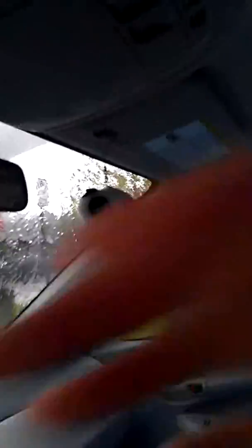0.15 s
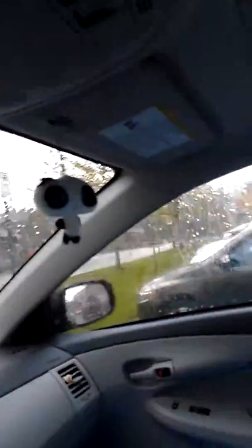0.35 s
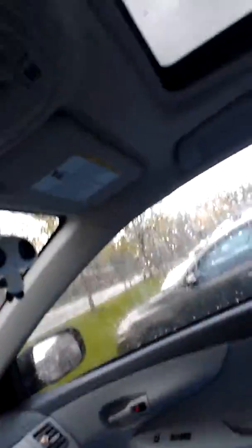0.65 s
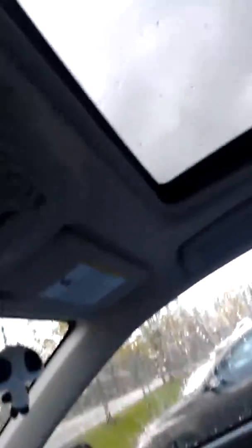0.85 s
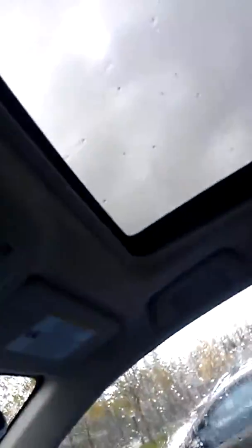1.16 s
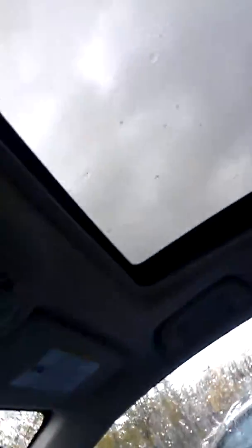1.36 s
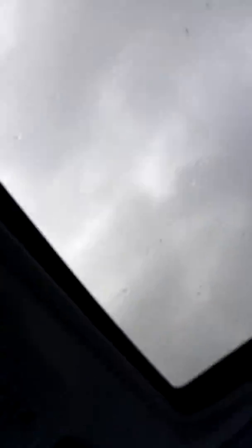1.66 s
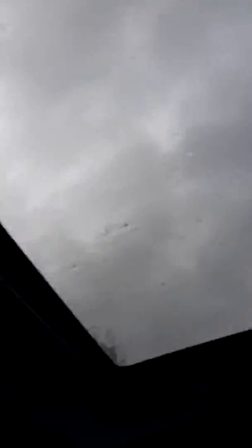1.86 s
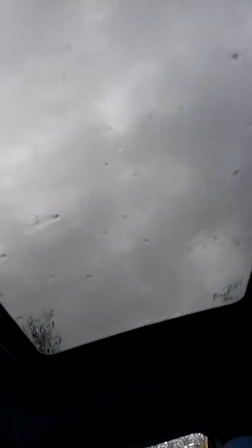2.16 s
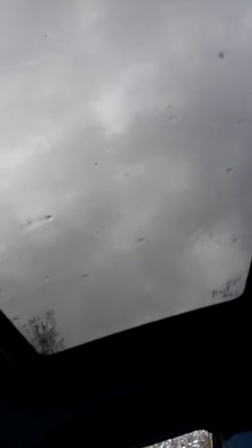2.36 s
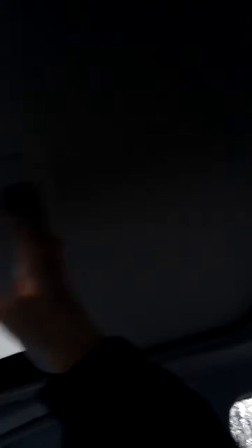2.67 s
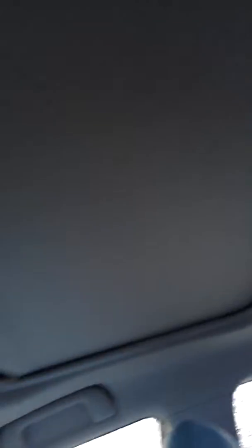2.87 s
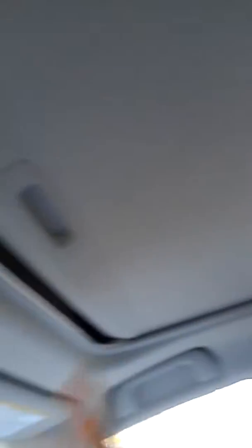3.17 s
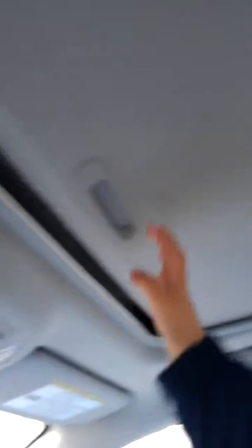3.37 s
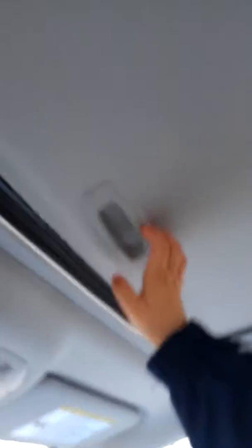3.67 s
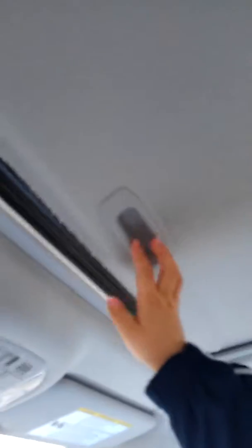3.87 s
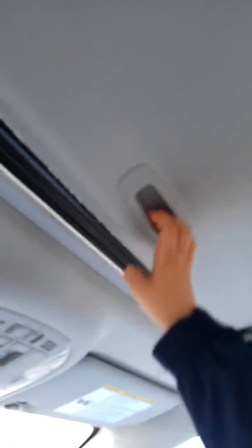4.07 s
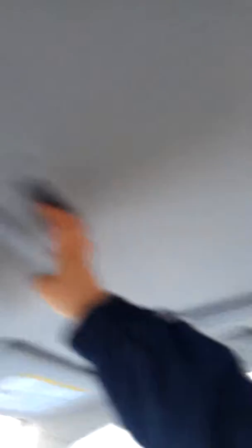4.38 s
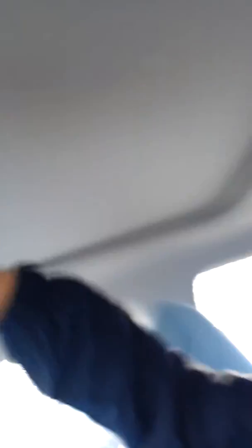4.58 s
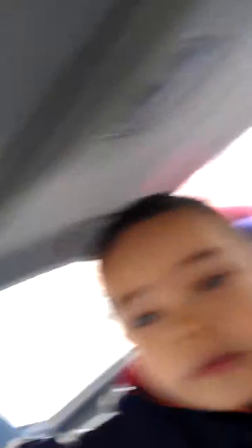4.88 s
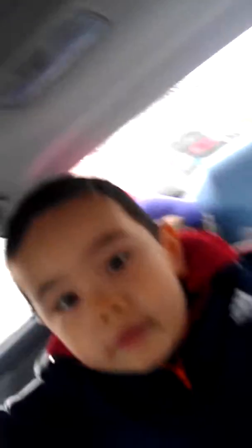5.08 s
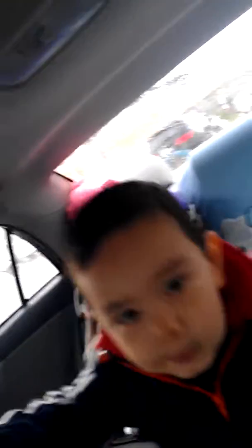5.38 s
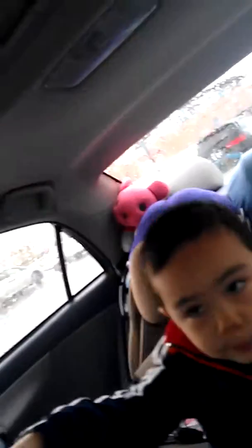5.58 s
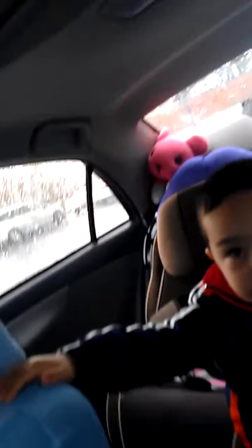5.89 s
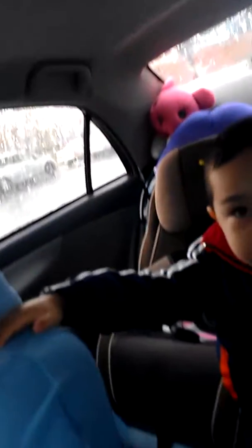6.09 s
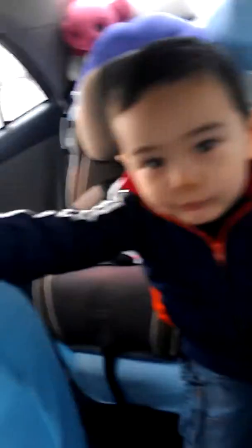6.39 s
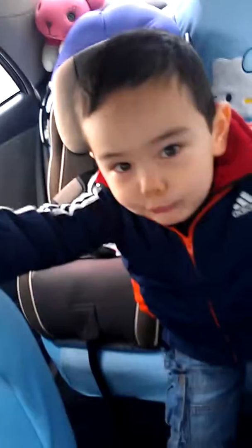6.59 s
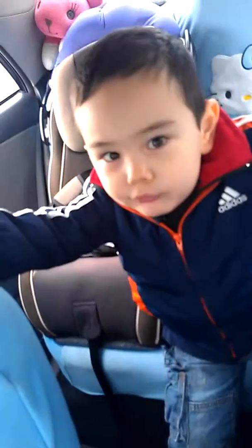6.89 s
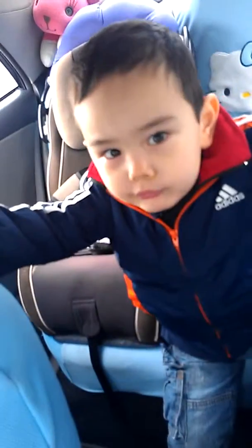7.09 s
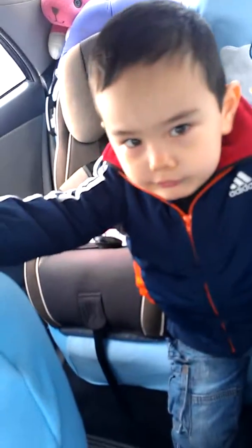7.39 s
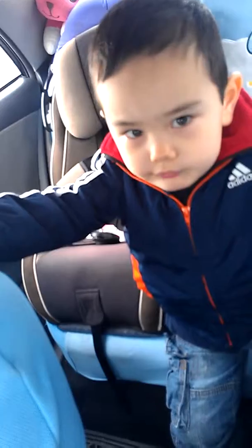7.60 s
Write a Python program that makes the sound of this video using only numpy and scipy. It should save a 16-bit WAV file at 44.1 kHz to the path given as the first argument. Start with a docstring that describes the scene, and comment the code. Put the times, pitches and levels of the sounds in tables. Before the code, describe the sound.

Inside a small car, dense dull rain patter with bright ticks on glass, a sliding overhead panel clacking to its stop, then one hollow thump.

```python
"""Inside a parked car in heavy rain: dull patter on the lined steel roof, bright ticks on the glass.
Drops are clumped random impulses that excite coloured noise and spot resonances; fat drops and spray stand out.
The sunroof's shade is unlatched and slid forward, as rubbing noise and juddering slips, and stops with a clack,
which dulls the rain; a moment later a hand pushes it fully home with a hollow knock.
Clack and knock are sums of decaying modes with a cabin tail; fingers tick thinly on the microphone's case."""
import sys
import numpy as np
from scipy import signal
from scipy.fft import rfft, irfft, next_fast_len
from scipy.io import wavfile
from scipy.ndimage import uniform_filter1d

SR = 44100
rng = np.random.default_rng(int(sys.argv[2]) if len(sys.argv) > 2 else 0)


def put_to_file(sound):
    """Save the sound as 16-bit audio at rate SR, in the file named by the first command-line argument."""
    columns = np.atleast_2d(sound).T  # one column per channel
    safe = np.clip(columns, -1, 1)
    whole_steps = np.round(safe * 32767)
    wavfile.write(sys.argv[1], SR, whole_steps.astype(np.int16))


N = 340893
T = np.arange(N) / SR
TAIL = T[:SR // 4]  # time axis of every short sound, which ends after a quarter second

# Strength of the rain: (time [s], level [dB])
RAIN_STRENGTH = [(0.0, -42.5), (0.9, -41.5), (1.4, -40), (1.53, -43), (1.72, -44.5), (1.8, -39), (2.3, -39),
                 (2.55, -39), (2.95, -38.5), (3.3, -43.5), (3.66, -45.5), (3.9, -40), (4.15, -43.5),
                 (4.45, -41.5), (4.62, -45.5), (5.1, -44), (5.85, -44), (6.12, -47), (6.28, -46),
                 (6.35, -50), (6.62, -46.5), (6.95, -44.5), (7.73, -45.5)]
# Power share of the glass's sound that passes the shade unmuffled: (time [s], share [0-1])
BARE_SHARE = [(0, 1), (2.0, 0.94), (2.5, 0.25), (2.85, 0.54), (4.25, 0.4), (4.35, 0.6)]
# Closeness of the microphone to the hollow behind the shade: (time [s], closeness [0-1])
HOLLOW_NEARNESS = [(0, 0), (1.9, 0.14), (2.3, 0.26), (4.28, 1), (4.38, 0.2)]
# Colour of the drops on each surface: (frequency [Hz], relative level [dB per Hz])
ROOF_COLOUR = [(60, -71), (105, -42), (156, -29.5), (200, -14), (250, -5.5), (330, -1.5), (400, 0.7),
               (500, 0), (620, -1), (790, 0.5), (1050, -1), (1400, -1), (1950, -2), (2190, -6.5),
               (2700, -5.5), (3400, -9.5), (5700, -77)]
BARE_GLASS_COLOUR = [(1180, -57), (2000, -2), (3340, -1.5), (3620, -1), (4440, -1.5), (5230, -1.5),
                     (7400, -7), (7980, -0.5), (8450, -0.5), (10700, -4.5), (12200, -17.5), (14000, -37)]
SHADED_GLASS_COLOUR = [(1200, -37), (2000, 3), (2400, -5.5), (3000, -2.5), (3700, 0.5), (4500, -4),
                       (5200, -6.5), (7200, -11), (8500, -3.5), (10500, -15.5), (11500, -27), (12700, -73)]
# Pitch range of the spots that the drops strike: (lowest [Hz], highest [Hz])
ROOF_SPOT_RANGE = (333.6, 2140)
GLASS_SPOT_RANGE = (2145, 9160)
# Resonances of the bare sunroof's pane: (frequency [Hz], width [Hz], gain [factor])
PANE_RESONANCES = [(680, 83, 0.49), (750, 90, 0.48), (1376, 77, 0.79)]
# Resonances of the glass under the ticks: (frequency [Hz], width [Hz], gain [factor])
GLASS_RESONANCES = [(3600, 280, 0.48), (5030, 44, 0.088), (8400, 90, 0.35)]
# Fattest single drops on the glass:
# (time [s], relative level [dB], splash t60 [s], brightness [dB per octave])
FATTEST_DROPS = [(0.034, -36, 0.055, 0), (0.2234, -25.5, 0.018, 2), (0.237, -26, 0.025, -1),
                 (0.509, -29.5, 0.15, -0.5), (0.5675, -28, 0.14, -2.5), (0.663, -20.5, 0.02, -2),
                 (0.667, -27.5, 0.13, -3), (0.747, -30, 0.038, 2), (0.824, -29, 0.025, -2),
                 (1.038, -26, 0.025, -4), (1.160, -27, 0.035, 1), (1.355, -28.5, 0.11, 0),
                 (1.394, -32, 0.037, -1), (1.419, -23.5, 0.041, -2.5), (1.440, -23.5, 0.036, 0),
                 (1.501, -28, .04, 1), (1.668, -22, 0.027, 0), (1.758, -28, 0.1, 2.5),
                 (1.881, -30, 0.081, 0), (2.512, -27, 0.11, -1), (2.893, -28.5, 0.12, 15),
                 (3.334, -29.5, 0.12, 6), (3.425, -36, 0.03, 5), (3.622, -33, 0.03, -6),
                 (3.699, -29.5, 0.04, 1), (3.782, -35, 0.025, 9), (3.806, -41, 0.024, 1),
                 (3.871, -29.5, 0.083, 6), (3.93, -26.5, 0.068, 6), (3.980, -23, 0.094, 2.5),
                 (3.994, -23, 0.05, -1), (4.026, -25.5, 0.035, -3), (4.093, -26, 0.028, 6),
                 (4.159, -28, 0.025, 10), (4.189, -29, 0.034, -4), (4.353, -24, 0.023, 2),
                 (4.439, -29, 0.025, 3), (4.613, -31.5, 0.045, 0), (4.716, -33, 0.052, 7),
                 (5.267, -33.5, 0.1, 4), (5.5019, -31.5, 0.15, 0), (6.277, -36, .04, 0),
                 (6.377, -38.5, 0.055, 2), (6.729, -33.5, 0.29, 3), (6.993, -33, 0.043, -4),
                 (7.279, -34.5, 0.04, 1), (7.363, -34.5, 0.051, 7), (7.611, -38.5, 0.095, 8)]
# Flurries, where a clump of water lands at once:
# (middle [s], length [s], thud on the roof [dB], spray on the glass [dB])
WATER_CLUMPS = [(0.345, 0.035, -43, -35.5), (0.78, 0.026, -50, -38), (1.317, 0.017, -37, -32.5),
                (1.45, 0.013, -39.5, -59), (1.598, 0.035, -36, -36.5), (1.659, 0.042, -41, -34),
                (3.12, 0.036, -39, -47), (3.398, 0.022, -38.5, -50), (3.531, 0.047, -41, -45),
                (3.747, 0.029, -42.5, -40), (4.246, 0.025, -48, -39.5), (4.888, 0.044, -49, -43.5),
                (5.32, 0.064, -44.5, -47), (5.967, 0.12, -43, -53), (6.21, 0.018, -46, -45),
                (6.233, 0.032, -42.5, -50), (7.017, 0.079, -48, -74)]

# Pushes that move the shade along its rails: (start [s], length [s], relative level [dB])
SHADE_PUSHES = [(1.979, 0.076, -30.5), (2.104, 0.31, -30), (2.486, 0.2, -40.5), (2.68, 0.056, -29.5)]
# Judders of the shade in its rails: (start [s], length [s], level [dB])
SHADE_JUDDERS = [(1.98, 0.019, -25), (2.134, 0.038, -34.5), (2.677, 0.029, -27), (2.769, 0.071, -36.5)]
# Colour of rubbing rails and of hard plastic: (frequency [Hz], relative level [dB per Hz])
RAIL_COLOUR = [(180, -66), (300, -16.5), (388, -7), (609, -7), (762, 1.5), (1220, -6.5), (1520, 3),
               (2350, -7), (3690, -6), (6900, -15), (8370, -9), (12100, -21.5), (14000, -91)]
PLASTIC_COLOUR = [(30, -27), (100, -25.5), (170, -25), (650, -8), (1150, -8), (1700, 2), (2900, -4.5),
                  (3900, 2.5), (4900, -3), (5800, 1), (6800, -5), (8400, 2), (11200, -6), (13500, -43)]
# Hard contacts of the plastic guides and latch:
# (time [s], level [dB], decay t60 [s], brightness [dB per octave])
GUIDE_CONTACTS = [(2.192, -18, 0.057, -2), (2.2, -30, 0.025, -4), (2.4312, -23, 0.031, 9),
                  (2.437, -25.5, 0.092, -6), (2.7996, -18, 0.015, -2), (2.8009, -15.5, 0.012, -1.5),
                  (2.8043, -14.5, 0.023, 1), (2.826, -29, 0.075, -2), (4.307, -21, 0.029, -5),
                  (4.315, -31, 0.02, -8)]
# The shade bumps lightly on its way, then meets its stop: (time [s], level [dB])
CLACK_BLOWS = [(2.654, -31), (2.8046, -10)]
# The shade is touched, pushed home against the roof lining and rebounds once: (time [s], level [dB])
KNOCK_BLOWS = [(4.285, -32.5), (4.3096, -8.5), (4.3279, -25)]
# Modes of the shade in each kind of blow: (frequency [Hz], relative level [dB], decay t60 [s])
CLACK_PARTIALS = [(510, -11, 0.05), (900, -3.5, 0.048), (1230, 2.5, 0.036), (1473, 4, 0.022),
                  (1584, -14, 0.072), (1986, -20, 0.09), (2100, -15, 0.049), (2900, -13, 0.052),
                  (4120, -7, 0.03)]
KNOCK_PARTIALS = [(353, -3.5, 0.11), (450, -3, 0.065), (493, -4, 0.08), (768, -2.5, 0.042),
                  (1030, -7.4, 0.041), (1329, -11, 0.055), (1447, -9, 0.022), (1813, -18, 0.12),
                  (1900, -26, 0.12), (2174, -22.5, 0.18)]
# Colour of the cabin's tail after each kind of blow: (frequency [Hz], relative level [dB per Hz])
CLACK_CABIN_COLOUR = [(88, -64), (150, -31), (391, -3.5), (971, -4), (1130, -13), (2060, -2), (2530, -26),
                      (3110, -13), (9000, -19), (11700, -49), (19800, -120)]
KNOCK_CABIN_COLOUR = [(40, -32), (90, -38), (135, -18.5), (200, -22.5), (260, -33), (335, -5), (450, -2),
                      (560, -15), (900, -11), (2150, -17), (2480, -30), (3400, -21.5), (4400, -24),
                      (9000, -34), (11700, -72)]
# Colour of the roof's ring after the knock: (frequency [Hz], relative level [dB per Hz])
ROOF_RING_COLOUR = [(150, -43), (330, -14), (600, 1), (1400, -9), (2150, 3), (2500, -14), (4000, -15),
                    (9000, -60)]
# Thin ticks of fingers on the microphone's case:
# (time [s], level [dB], decay t60 [s], brightness [dB per octave])
FINGER_TICKS = [(.1355, -29, 0.019, -3), (1.122, -34, 0.038, 11), (1.2255, -30, 0.02, 6),
                (1.2285, -22, 0.03, -1), (6.7876, -36, 0.023, 5), (6.8015, -36, 0.032, 3),
                (7.0985, -35, 0.012, 3), (7.4252, -34, 0.029, 6)]
# Colour of the case: (frequency [Hz], relative level [dB per Hz])
CASE_COLOUR = [(30, -20), (100, -22), (200, -20), (1500, -11), (3300, -4), (4700, 4), (7000, -1), (8400, 9),
               (9600, 1), (11200, -12), (13500, -38)]
# Likeness of the two microphones: (frequency [Hz], likeness [0-1])
MICROPHONE_LIKENESS = [(100, .97), (1000, .94), (2500, .76), (6000, .66), (13000, .52)]

# Levels against the rain's strength: roof, glass under a bare and under a shaded sunroof
ROOF_DB, BARE_GLASS_DB, SHADED_GLASS_DB = -0.85, -2.8, -7
# The glass swings more than the roof: factor on the swing about the usual strength
GLASS_FOLLOWS, USUAL_RAIN_DB = 1.19, -43
# Chance wavering of the fall: rate, spread shared by all panels, spread of each panel alone
WAVER_PER_S, WAVER_DB, PANEL_WAVER_DB = 16, 1.0, 0.34
# Lesser drops: number, level relative to the rain before the splash's own level, spread, splash decay
STRAY_COUNT, STRAY_DB, STRAY_SPREAD_DB, STRAY_T60_S = 40, -1.5, 2.5, 0.06
TREBLE_HZ = 2000  # brightness tilts the sound above this pitch
CONTACT_S = 0.0004  # time constant of a blow's onset
WIDENING_LAG = 72  # delay of the stereo widening, in samples
CUTOFF_HZ = 13700


def rain(boom_hz=410, boom_width_hz=260, boom_gain=0.73):
    """Panel excitation: the roof thuds, the hollow behind the shade booms, the glass ticks and rings."""
    rain_db = in_time(RAIN_STRENGTH)[0] + WAVER_DB * drift(WAVER_PER_S)
    roof_db = rain_db + ROOF_DB + PANEL_WAVER_DB * drift(WAVER_PER_S)
    glass_swing_db = GLASS_FOLLOWS * (rain_db - USUAL_RAIN_DB)
    glass_db = USUAL_RAIN_DB + glass_swing_db + PANEL_WAVER_DB * drift(WAVER_PER_S)
    thuds = sum(from_db(db) * swell(T - s, length) for s, length, db, _ in WATER_CLUMPS)
    bare = np.clip(in_time(BARE_SHARE)[0], 0, 1)

    roof = patter(ROOF_COLOUR, ROOF_SPOT_RANGE, per_s=1100, spread_db=2.5, clump_db=1.5,
                  crack_t60=0.011, ring_t60=0.094, ring_db=5, tone_gain=2.53, tone_q=11.7)
    nearness = in_time(HOLLOW_NEARNESS)[0]
    boom = boom_gain * nearness * resonance(roof, boom_hz, boom_width_hz)
    # the sunroof's pane rings in proportion to its bare share
    pane = bare * sum(gain * resonance(roof, hz, width_hz) for hz, width_hz, gain in PANE_RESONANCES)

    bare_ticks = patter(BARE_GLASS_COLOUR, GLASS_SPOT_RANGE, per_s=1100, spread_db=4.5, clump_db=1.5,
                        crack_t60=0.0011, ring_t60=0.095, ring_db=-6.0, tone_gain=4.6, tone_q=3.9)
    shaded_ticks = patter(SHADED_GLASS_COLOUR, GLASS_SPOT_RANGE, per_s=1500, spread_db=6.5, clump_db=3.5,
                          crack_t60=0.012, ring_t60=0.066, ring_db=12, tone_gain=1.64, tone_q=9.8)
    glass = np.sqrt(bare) * from_db(BARE_GLASS_DB) * bare_ticks
    glass = glass + np.sqrt(1 - bare) * from_db(SHADED_GLASS_DB) * shaded_ticks
    glass = glass + sum(gain * resonance(glass, hz, width_hz) for hz, width_hz, gain in GLASS_RESONANCES)

    roof_level = np.hypot(from_db(roof_db), thuds)  # steady fall and flurries add in power
    return roof_level * (roof + boom + pane) + from_db(glass_db) * glass


def patter(spectrum, spots_hz, per_s, spread_db, clump_db, crack_t60, ring_t60, ring_db, tone_gain, tone_q,
           count=20):
    """Shot noise: uneven drops land in clumps on many spots, each cracking and ringing at its own pitch."""
    landed = rng.random(N) < per_s * from_db(clump_db * drift(45)) / SR
    size_db = spread_db * np.minimum(rng.exponential(1, N), 4)
    sizes = landed * from_db(size_db) * rng.choice([-1, 1], N)
    spot = rng.integers(0, count, N)
    envelope = (fade(crack_t60) + from_db(ring_db) * fade(ring_t60))[:SR // 12]
    sound = 0
    for k, hz in enumerate(np.geomspace(*spots_hz, count)):
        drop = coloured(envelope, spectrum)
        drop = drop + tone_gain * resonance(drop, hz, hz / tone_q)
        hits = (sizes * (spot == k))[None]
        sound = sound + signal.oaconvolve(hits, drop, axes=1)[:, :N]
    # the level is evened out over about a tenth of a second
    power = uniform_filter1d(np.mean(sound, axis=0) ** 2, size=4500)
    return sound / np.sqrt(power + 1e-12)


def fat_drops(splash_db=-6.5, burst_t60=0.0014, tone_gain=0.48, tone_q=9):
    """Impact and resonance: a big drop bursts into a short splash and rings the spot of glass it strikes."""
    out = np.zeros((2, N))
    for s, db, t60, tilt in stray_drops() + list(FATTEST_DROPS):
        envelope = (1 - fade(burst_t60)) * fade(t60)
        splash = coloured(envelope, tilted(glass_colour(s), tilt))
        hz = np.exp(rng.uniform(*np.log(GLASS_SPOT_RANGE)))
        tone = tone_gain * resonance(splash, hz, hz / tone_q)
        add(out, s, from_db(db + splash_db) * (splash + tone))
    return out


def stray_drops(tilt_spread_db=-3.0):
    """Random arrivals: lesser drops at uniform times, with levels that follow the strength of the rain."""
    s = rng.uniform(0, T[-1], STRAY_COUNT)
    strength_db = np.interp(s, *np.transpose(RAIN_STRENGTH))
    db = strength_db + STRAY_DB + STRAY_SPREAD_DB * rng.standard_normal(STRAY_COUNT)
    tilts = tilt_spread_db * rng.standard_normal(STRAY_COUNT)
    return [(at, level, STRAY_T60_S, tilt) for at, level, tilt in zip(s, db, tilts)]


def flurries():
    """Dense superposed impacts: fine spray is noise that swells and dies within a short time."""
    out = np.zeros((2, N))
    for s, length, _, db in WATER_CLUMPS:
        spray = coloured(swell(TAIL - 2 * length, length), glass_colour(s))
        add(out, s - 2 * length, from_db(db) * spray)
    return out


def glass_colour(s):
    """Muffling: the glass sounds duller once the shade has met its stop."""
    return BARE_GLASS_COLOUR if s < CLACK_BLOWS[-1][0] else SHADED_GLASS_COLOUR


def shade_slide(rub_db=-1.5, rough_db=2.5):
    """Sliding friction: uneven rubbing noise whose level rises and falls with the shade's speed."""
    speed = sum(from_db(db) * np.sin(np.pi * np.clip((T - start) / length, 0, 1))
                for start, length, db in SHADE_PUSHES)
    return coloured(speed * from_db(rub_db + rough_db * drift(250)), RAIL_COLOUR)


def shade_judder(slips_per_s=330, slip_spread=0.35, slip_t60=0.026):
    """Stick-slip friction: where the shade sticks it judders in a run of irregular slips."""
    out = np.zeros((2, N))
    for start, length, judder_db in SHADE_JUDDERS:
        gaps = np.exp(slip_spread * rng.standard_normal(size=40)) / slips_per_s
        slip_at = ((np.cumsum(gaps) - gaps[0]) * SR).astype(int)
        slips = np.zeros(len(TAIL))
        slips[np.minimum(slip_at, len(TAIL) - 1)] = 1
        # overlapping slips add in power
        run = np.sqrt(np.abs(signal.oaconvolve(slips, fade(slip_t60) ** 2)[:len(TAIL)]))
        run = run / np.sqrt(np.mean(run[TAIL < length] ** 2))
        burst = run * np.exp(-(TAIL / length) ** 4)
        add(out, start, from_db(judder_db) * coloured(burst, PLASTIC_COLOUR))
    return out


def panel_blow(blows, modes, tail_colour, low_hz, cabin_db, cabin_t60, build_t60):
    """Modal vibration: a blow rings the panel's modes; the upholstered cabin adds a short dull tail."""
    ring = sum(from_db(db) * fade(t60) * np.sin(2 * np.pi * hz * TAIL) for hz, db, t60 in modes)
    ring = ring * (1 - np.exp(-TAIL / CONTACT_S))
    # a small panel radiates little below its lowest mode
    ring = signal.sosfilt(signal.butter(4, low_hz, "high", fs=SR, output="sos"), ring)
    out = np.zeros((2, N))
    for s, db in blows:
        cabin = from_db(cabin_db) * coloured(fade(cabin_t60) * (1 - fade(build_t60)), tail_colour)
        add(out, s, from_db(db) * (ring + cabin))
    return out


def roof_ring(ring_db=-24.5, ring_t60=0.5, build_t60=0.03):
    """Structure-borne sound: the knock spreads into the roof, which rings on faintly in the middle range."""
    out = np.zeros((2, N))
    for s, db in KNOCK_BLOWS:
        ring = coloured(fade(ring_t60) * (1 - fade(build_t60)), ROOF_RING_COLOUR)
        add(out, s, from_db(db + ring_db) * ring)
    return out


def clicks(contacts, spectrum):
    """Impulsive contact: short snaps of coloured noise that decay exponentially."""
    out = np.zeros((2, N))
    for s, db, t60, tilt in contacts:
        add(out, s, from_db(db) * coloured(fade(t60), tilted(spectrum, tilt)))
    return out


def coloured(envelope, spectrum):
    """Minimum-phase filtering: enveloped noise of unit power gain at two partly alike microphones."""
    size = next_fast_len(len(envelope) // 2 + 1024) * 2
    hz = np.arange(size // 2 + 1) * SR / size
    gain = rms_one(from_db(at_hz(spectrum, hz)) + 1e-5)
    # folding the cepstrum makes the filter causal
    cepstrum = irfft(np.log(gain))
    cepstrum[1:size // 2] *= 2
    cepstrum[size // 2 + 1:] = 0
    noise = rng.standard_normal((2, len(envelope))) * envelope
    mid, side = rfft(noise, size) * np.exp(rfft(cepstrum))
    alike = np.clip(at_hz(MICROPHONE_LIKENESS, hz), 0, 1)
    side = np.sqrt((1 - alike) / (1 + alike)) * side
    return irfft(mid + side * [[1], [-1]])[:, :len(envelope)]


def resonance(x, hz, width_hz):
    """Resonance: a single peak filter of gain 1 at its centre."""
    return signal.lfilter(*signal.iirpeak(hz, hz / width_hz, fs=SR), x)


def tilted(spectrum, tilt_db):
    """Spectral tilt: brighten or dull a spectrum's treble by so many dB per octave."""
    return [(hz, db + tilt_db * np.log2(max(hz / TREBLE_HZ, 1))) for hz, db in spectrum]


def fade(t60):
    """Exponential decay: the level falls by 60 dB in t60 seconds."""
    return np.exp(-np.log(1000) * TAIL / max(t60, 1e-3))


def swell(t, length):
    """Gaussian envelope: a bell-shaped rise and fall around t = 0."""
    return np.exp(-2 * (t / length) ** 2)


def drift(rate):
    """Random modulation: chance values, `rate` per second, joined by lines and scaled to rms 1."""
    knots = rng.standard_normal(N // 40)
    return rms_one(np.interp(T * rate, np.arange(len(knots)), knots))


def from_db(db):
    """Decibel definition: level to amplitude gain."""
    return 10 ** (np.asarray(db) / 20)


def rms_one(x):
    """Normalisation: scale to rms 1."""
    return x / np.sqrt(np.mean(x ** 2) + 1e-20)


def in_time(rows):
    """Linear interpolation: each column of a curve at every sample."""
    s, *columns = np.transpose(rows)
    return [np.interp(T, s, c) for c in columns]


def at_hz(points, hz):
    """Logarithmic pitch: read a table on a log-frequency axis."""
    f, value = np.transpose(points)
    return np.interp(np.log(hz + 1), np.log(f), value)


def add(track, s, sound):
    """Superposition: mix a short sound in at time s."""
    at = int(s * SR)
    track[:, at:at + sound.shape[1]] += sound[:, :N - at]


def scene():
    """Superposition: rain all round, the shade overhead, fingers on the case."""
    clack = panel_blow(CLACK_BLOWS, CLACK_PARTIALS, CLACK_CABIN_COLOUR,
                       low_hz=428, cabin_db=-9.5, cabin_t60=0.11, build_t60=0.0072)
    knock = panel_blow(KNOCK_BLOWS, KNOCK_PARTIALS, KNOCK_CABIN_COLOUR,
                       low_hz=319, cabin_db=-12.5, cabin_t60=0.16, build_t60=0.0079)
    sliding = shade_slide() + shade_judder()
    guides = clicks(GUIDE_CONTACTS, PLASTIC_COLOUR)
    shade = sliding + guides + clack + knock + roof_ring()
    water = rain() + fat_drops() + flurries()
    fingers = clicks(FINGER_TICKS, CASE_COLOUR)
    return water + shade + fingers


def record(dry, width=0.56, bass_width=0.34, bass_hz=2000):
    """Decorrelation: a delayed middle, opposite in each ear, widens the image, most in the bass; top cut."""
    delayed = np.pad(dry.mean(axis=0), (WIDENING_LAG, 0))[:N]
    bass = signal.filtfilt(*signal.butter(1, bass_hz, fs=SR), delayed)
    wide = dry + (width * delayed + bass_width * bass) * [[-1], [1]]
    return signal.sosfilt(signal.ellip(10, .2, 80, CUTOFF_HZ, fs=SR, output="sos"), wide)


dry = scene()
out = record(dry)
put_to_file(out)
```